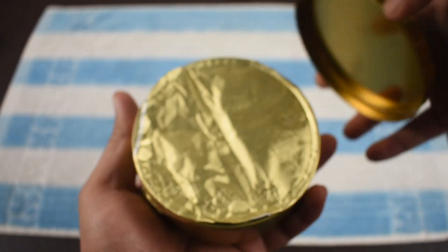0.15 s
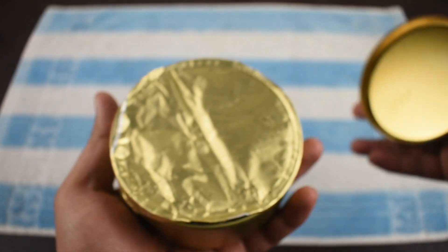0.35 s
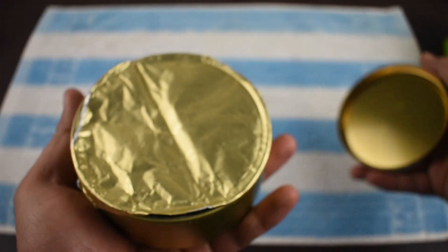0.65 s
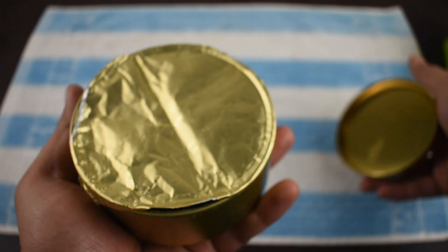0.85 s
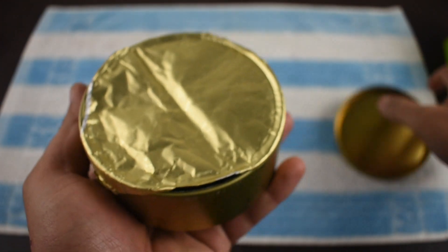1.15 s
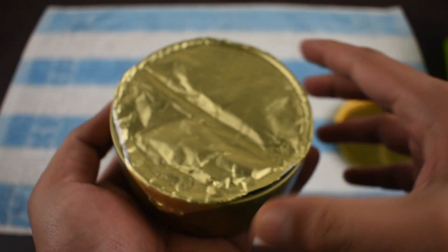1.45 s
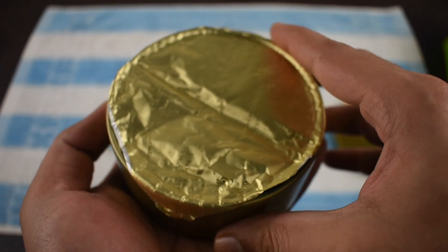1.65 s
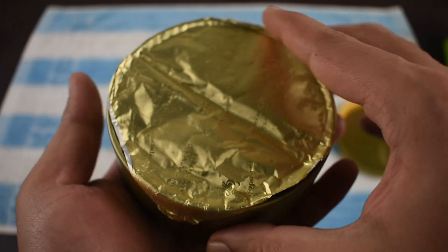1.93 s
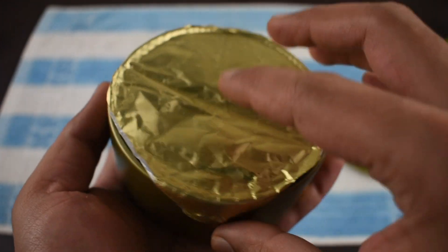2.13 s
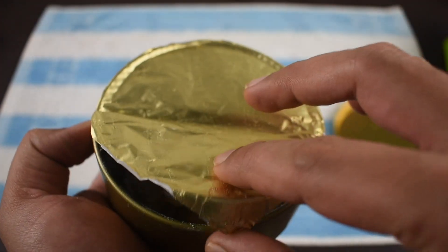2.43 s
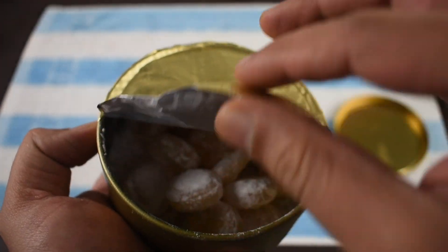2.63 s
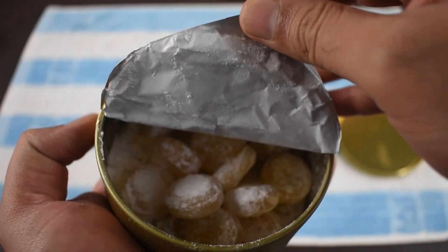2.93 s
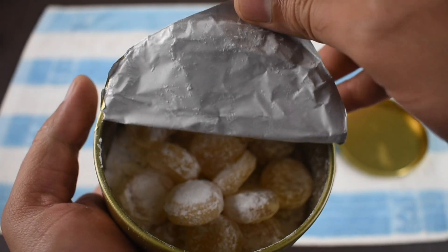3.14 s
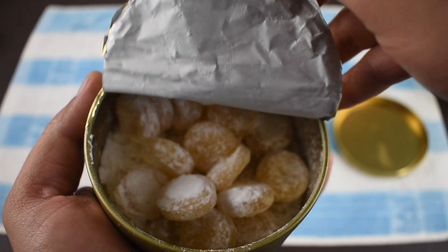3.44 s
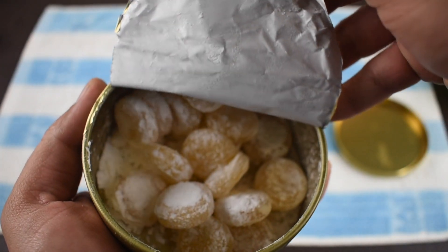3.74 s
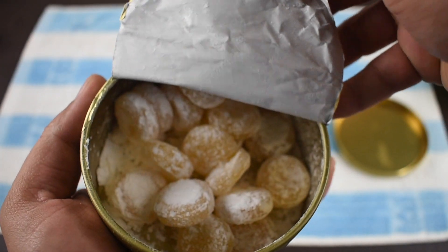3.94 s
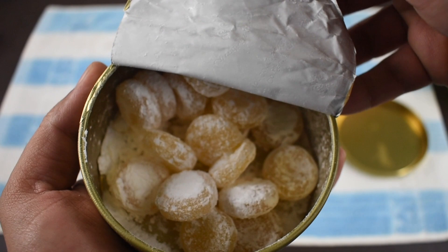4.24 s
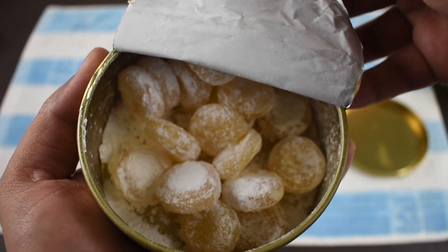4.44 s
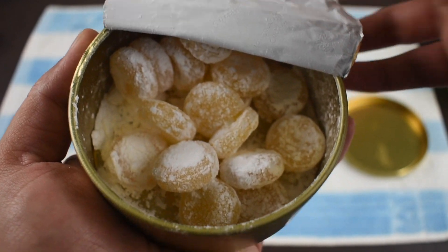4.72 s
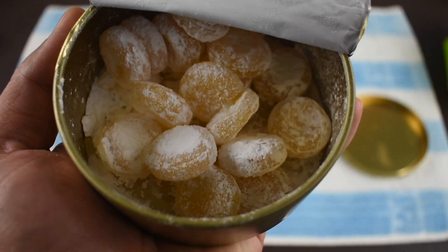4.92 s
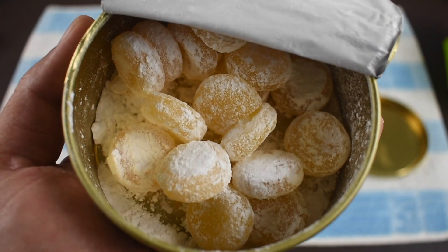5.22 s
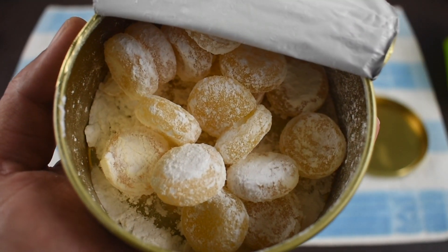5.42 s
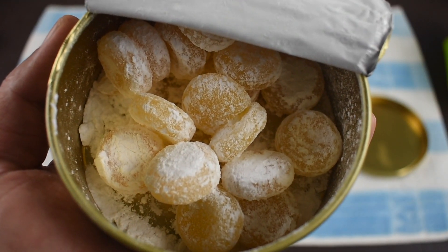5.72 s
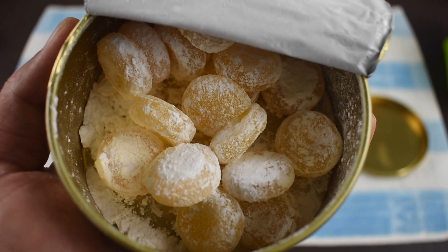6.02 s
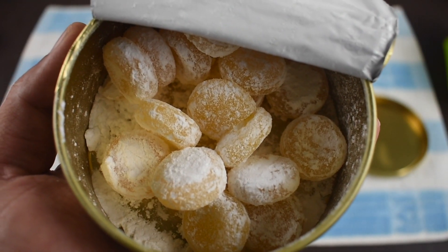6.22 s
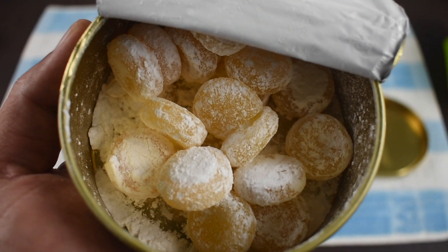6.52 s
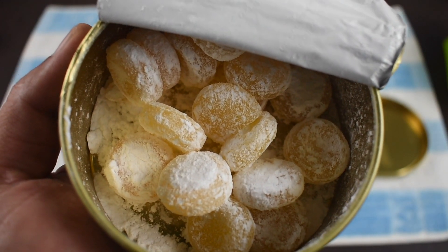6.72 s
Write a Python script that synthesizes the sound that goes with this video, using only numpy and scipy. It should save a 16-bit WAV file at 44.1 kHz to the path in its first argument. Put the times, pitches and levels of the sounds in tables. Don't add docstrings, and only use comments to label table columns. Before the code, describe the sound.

A quiet, hard-walled room with faint steady hiss and a low murmur, the microphone very close. Only tiny ticks and a soft tap at first. At about 1.0 s a metal lid lands on cloth with a soft brushing slide, settling by 1.4. Fingers lightly rub foil from 1.6, tap near 1.95, then rub firmly at 2.2 to 2.3 with small dull crinkles, fading by 2.8. From 3.1 the foil snaps sharply, building to a very loud crack at 3.33 and another bright one at 3.5, ringing thinly with a short room tail; small ticks follow to 3.75. Faint creases at 3.9 and 4.25. At 4.65 the flap scrapes briefly and knocks the tin rim, sharpest at 4.76. A soft dull grip shift spans 5 to 5.7. A clear dry click at 5.93, then quiet, and a quick cluster of small clicks at 6.54 to 6.64.

```python
import sys
import numpy as np
from scipy import signal
from scipy.fft import rfft, irfft
from scipy.io import wavfile

SR = 44100
rng = np.random.default_rng(int(sys.argv[2]) if len(sys.argv) > 2 else 0)


def materialize(psi):
    bounded = np.clip(np.atleast_2d(psi).T, -1, 1)
    quanta = np.round(bounded * 32767).astype(np.int16)
    wavfile.write(sys.argv[1], SR, quanta)


def volts(x):
    e = np.asarray(x, float) / 20
    return 10 ** e


N = 302878

# start in seconds, peak in dB, crease pitch in Hz,
# thump below 700 Hz in dB, sharpness (edge level) in dB.
CREASE_SNAPS = [(2.212, -33, 1900, -8.5, -13), (2.246, -35, 826, -7, -21), (2.271, -40, 940, -30, -10),
                (2.313, -38, 1190, -27, -18), (3.092, -15, 1097, -23.5, -20.5),
                (3.225, -16, 1010, -20, -19.5), (3.244, -17.5, 1400, -25, -36.5),
                (3.293, -11, 1780, -22.5, -41), (3.331, -0.5, 1190, -20, -10),
                (3.496, -7.5, 1215, -21.5, -0.5), (3.874, -34.5, 2340, -7.5, -4.5),
                (3.883, -28, 2460, -25, -8.5), (3.911, -36.5, 1304, -9, 0), (4.255, -43, 1570, -18, -3.5)]
RIM_KNOCKS = [
    (4.655, -38, 1480, -9, -5),
    (4.75, -31, 1070, -5, -9),
    (4.759, -26.5, 2240, -8.5, 6),
]
# start in seconds, peak in dB, pitch in Hz,
# ring near 1.2 kHz in dB, sharpness in dB.
LOOSE_CLICKS = [
    (5.467, -45, 2760, -12, -4),
    (5.773, -51.5, 3050, -14, -2),
    (5.9319, -17.5, 2560, -12.5, -6.5),
    (6.5355, -33.5, 2480, -4, -13),
    (6.539, -45.5, 2000, 12, -16),
    (6.6055, -40, 2300, -13, -2.2),
    (6.6086, -36, 2600, -4, 9),
    (6.6152, -33, 2460, -8, -10),
    (6.6195, -37, 2500, 1.5, -13),
    (6.6435, -42, 2890, -0.5, -4),
]
# frequency in Hz, level in dB, t60 in seconds.
FOIL_MODES = [(338, -1.5, 0.093), (426, -2.5, 0.16), (733, -10.5, 0.75), (790, -9.5, 0.26),
              (961, -5.5, 0.15), (1108, -9.5, 0.25), (1274, -15, 0.23), (1293, -16, 0.14), (1384, -4, 0.3),
              (1601, -17.5, 0.93), (1780, -3, 0.23), (2040, -12, 0.15), (2050, -13.5, 0.4),
              (2238, -8.5, 0.3), (2660, -9, .3), (3240, -13.5, 0.25), (4130, -13.5, 0.32), (5405, -9, .12),
              (6920, -26, .25)]
# frequency in Hz, level in dB, t60 in seconds.
TIN_MODES = [(371, 1.5, 0.19), (402, -6, 0.18), (644, -6.5, 0.23), (676, -6, .15), (826, -1, 0.14),
             (1187, 2, 0.13), (1590, -4, 0.32), (2310, -11, .22), (2300, -1, 0.13), (3500, -22, .12),
             (4040, -15, 0.17), (5540, -8, 0.14), (6000, -7, 0.18)]
# frequency in Hz, level in dB, t60 in seconds.
HOUSING_MODES = [(2567, -0.5, 0.016), (3750, 1.5, 0.011), (531, 2.5, 0.03), (1610, -12, 0.022)]

# time of greatest pressure in seconds, level in dB,
# seconds to rise 20 dB, seconds to fall 20 dB, hiss over body in dB.
FLAP_STROKES = [
    (4.656, -48, .008, 0.096, -3),
    (4.73, -47, 0.28, .05, 11),
]
FINGER_STROKES = [
    (1.698, -63.5, 0.25, 0.68, 1.6),
    (1.966, -52, 0.02, 0.029, -10),
    (2.21, -45.5, 0.0046, 0.048, -0.5),
    (2.242, -43, .02, 0.16, -12),
    (2.318, -52.5, 0.035, 0.38, -4),
    (2.478, -59, .08, .25, 2.5),
    (2.562, -52.5, 0.022, 0.18, -2.2),
]
LID_STROKES = [
    (1.005, -57, .25, .05, 2.5),
    (1.017, -39.5, .006, .14, -6),
    (1.034, -42.5, .015, .2, 4),
    (1.225, -51, .04, .2, -6),
]
GRIP_STROKES = [
    (5.076, -61.5, .11, 0.84, -18),
    (5.47, -58.5, .018, .04, -20),
    (5.49, -66, 0.028, 0.28, -16),
]
FLAP_SPAN_S = (4.648, 4.748)
FINGER_SPAN_S = (1.55, 2.8)
LID_SPAN_S = (.85, 1.5)
GRIP_SPAN_S = (4.95, 5.75)
# frequency in Hz, density in dB per Hz.
FLAP_COLOUR = [(88, -51.5), (150, -15.5), (566, -14), (649, -5), (888, -5), (1980, -4.5), (2220, -1.5),
               (2500, -9), (7770, -17), (16000, -29)]
FINGER_COLOUR = [(88, -50), (150, -38), (226, 4.5), (368, -18), (555, -13), (612, 1.5), (979, -4),
                 (3350, -11), (8230, -22), (14800, -25), (16000, -37)]
LID_COLOUR = [(88, -43), (150, -36), (280, -12.5), (368, -51), (422, -36), (702, -11.5), (1500, -2.5),
              (1660, -11), (2060, -6), (8230, -21.5), (16000, -30)]
GRIP_COLOUR = [(100, -20), (300, -4.5), (550, 2), (900, -12.5), (1600, -1.5), (2300, -5), (3500, -19.5),
               (16000, -37.5)]
# frequency in Hz, width in Hz, level in dB.
FLAP_RINGS = [(2180, 12, 5), (2710, 31, 1), (3630, 140, 2), (4330, 45, -4), (5500, 39, -4), (5670, 83, -3),
              (7920, 21, -8), (11100, 85, -12), (14300, 100, -15)]
FINGER_RINGS = [(989, 67, 5), (1190, 39, -2), (1455, 21, 4), (2190, 40, -7), (4210, 27, -25),
                (8230, 270, -20), (9500, 92, -18)]

# start in seconds,
# peak in dB, pitch in Hz.
WRINKLE_TICKS = [(.0494, -47, 3500), (.5384, -48, 6570), (1.236, -49, 12500), (2.9577, -54, 9540),
                 (2.9816, -42, 7360), (2.9994, -49, 8500), (3.3124, -40, 9500), (3.3203, -40, 9500),
                 (3.328, -42, 9000), (3.4535, -42, 4300), (3.477, -35.5, 4500), (3.5313, -18, 3240),
                 (3.6625, -26.5, 2800), (3.7197, -33, 3830), (3.741, -35, 2570), (3.9195, -43, 5540),
                 (4.59, -39, 7000), (4.6075, -42.5, 3980), (4.638, -37.5, 4995), (6.595, -45, 3500)]
# start in seconds, peak in dB, pitch in Hz.
FINGER_TAPS = [
    (0.161, -48, 980),
    (1.907, -47, 860),
    (1.968, -44.5, 950),
]
# start in seconds, peak in dB, pitch in Hz.
HANDLING_BUMPS = [
    (1.06, -60, 115),
    (2.24, -54, 232),
    (3.885, -63, 106),
    (4.755, -59, 141),
    (5.4, -69.5, 116),
    (6.537, -58, 230),
    (6.6, -73, 90),
]

# frequency in Hz, t60 in seconds, level in dB.
ROOM_DECAY = [(150, .5, -4), (511, 0.8, 4.5), (1400, 0.61, -2), (3710, 0.49, 4), (5800, .55, 9),
              (9736, 0.51, 8), (16000, 0.35, 3.5)]
# frequency in Hz, density in dB per Hz.
HISS_COLOUR = [(15, -49.5), (25, -18), (65, -25.5), (124, -8), (397, -3.5), (550, -2.5), (2250, -5),
               (8280, -12.5), (15000, -20.5), (16300, -36.5)]
# frequency in Hz, width in Hz, level in dB.
MURMUR_RESONANCES = [(120, 30, -14.5), (364, 100, -4), (426, 100, 0.5), (548, 65, -1), (820, 45, -3),
                     (1316, 58, -3), (1820, 80, -6)]
# time in seconds, level in dB.
STIR_LEVEL = [(0, -66), (.6, -71.5), (1.2, -58.5), (1.7, -64), (3.799, -67), (4.3, -77), (5.6, -66.5),
              (6.87, -66.5)]
# time in seconds, level in dB.
WHINE_LEVEL = [(2.2, -90), (2.35, -69.5), (2.8, -70), (3.0, -84)]


def snaps(events, rise_s, t60, low_hz, crack_db, crack_follows):
    near, sent = np.zeros(N), np.zeros(N)
    t = np.arange(2048) / SR
    single = 1.0 * (np.arange(2048) == 32 * np.arange(4)[:, None])
    envelope = (1 - np.exp(-t / rise_s)) * volts(-60 * t / t60) * (1 + np.exp(-t / 0.00075))
    draws = rng.standard_normal((len(events), 4, 2048))
    for (s, peak_db, hz, thump_db, sharp_db), draw in zip(events, draws):
        colour = hz, thump_db, sharp_db, crack_db + crack_follows * sharp_db
        near = place(near, s, volts(peak_db) * sheet_parts(draw * envelope, low_hz, *colour))
        sent = place(sent, s, volts(peak_db) * sheet_parts(single, low_hz, *colour))
    return near, sent


def sheet_parts(drive, low_hz, hz, thump_db, edge_db, crack_db):
    top_hz = np.clip(14000 * volts(0.34 * crack_db), 6000, 18000)
    crease = band(band(drive[0], 0.51 * hz, 2.68 * hz), 0.74 * hz, 9.3 * hz)
    crease = resonate(crease, hz, 0.36 * hz)
    thump = band(band(drive[1], 0.83 * low_hz, 1.65 * low_hz), 0.4 * low_hz, 1.8 * low_hz)
    edge = band(band(drive[2], 2500, 5200), 2000, 6500)
    crack = band(band(drive[3], 4200, top_hz), 3800, 19000)
    low_parts = peak_one(crease) + volts(thump_db) * peak_one(thump)
    return low_parts + volts(edge_db) * peak_one(edge) + volts(crack_db) * peak_one(crack)


def modes(push, table, gain_db):
    return sum(volts(db + gain_db) * ring(push, hz, min(t60, 0.38)) for hz, db, t60 in table)


def slide(strokes, span_s, colour, per_s, spread_db, haste, rings=()):
    begin, end = span_s
    start, size = round(begin * SR), round((end - begin) * SR)
    t = (start + np.arange(size)) / SR
    slips = (rng.random(size) < per_s / SR) * volts(spread_db * np.minimum(rng.exponential(1, size), 4))
    slips = slips * rng.choice([-1, 1], size)
    sound = coloured(slips, colour)
    sound = sound + sum(volts(db / 4 + 10) * resonate(sound, hz, 2.1 * width) for hz, width, db in rings)
    body = band(sound, 120, 4500)
    hiss = band(sound[::-1], 4500, 17000)
    body_gain, hiss_gain = pressure(strokes, t, haste)
    fade = np.clip(np.minimum(t - begin, end - t) / 0.0034, 0, 1)
    out = np.zeros(N)
    out[start:start + size] = fade * (rms_one(body) * body_gain + rms_one(hiss) * hiss_gain)
    return out


def pressure(strokes, t, haste):
    s, peak_db, rise_s, fall_s, hiss_db = np.transpose(strokes)[:, :, None]
    before, after = (s - t) / np.maximum(rise_s, 0.001), (t - s) / np.maximum(fall_s, 0.001)
    away_db = 20 * np.maximum(before, after)
    levels = peak_db - away_db, peak_db + hiss_db - haste * away_db
    return [np.sqrt(np.sum(volts(db) ** 2, axis=0)) for db in levels]


def blips(events, width, t60):
    out, t = np.zeros(N), np.arange(6144) / SR
    for (s, peak_db, hz), draw in zip(events, rng.standard_normal((len(events), 6144))):
        burst = resonate(draw * volts(-60 * t / t60), hz, width * hz)
        burst = resonate(burst, hz, 2.0 * width * hz)
        out = place(out, s, volts(peak_db) * peak_one(burst))
    return out


def room(x):
    size = 30000
    t, edges = np.arange(size) / SR, 120 * 2 ** np.arange(0, 7.6, 0.5)
    white = rng.standard_normal((2, size))
    lumps = drift(220)[:size]
    tail = 0
    for k, (low, high) in enumerate(zip(edges, edges[1:])):
        patchy_db = 1.5 * (1.5 * lumps + 0.45 * drift(35)[:size])
        level_db = at_hz(ROOM_DECAY, low * 1.34, axis=2) + patchy_db
        tail = tail + band(white[k % 2], low, high) * volts(level_db - 60 * t / at_hz(ROOM_DECAY, low))
    build_up = 1 - np.exp(-(t / 0.0017) ** 2)
    return signal.fftconvolve(x, tail * build_up)[:N]


def hush():
    t = np.arange(N) / SR
    still = volts(-60) * rms_one(coloured(rng.standard_normal(N), HISS_COLOUR))
    air = rng.standard_normal(N)
    stir = 0
    for hz, width, db in MURMUR_RESONANCES:
        swell = volts(db + 3 * drift(6.0))
        stir = stir + swell * rms_one(resonate(resonate(air, hz, width), hz, 3 * width))
    stir_db = np.interp(t, *np.transpose(STIR_LEVEL))
    whine_hz, width_hz = 2090, 12
    whine = rms_one(resonate(resonate(air, whine_hz, width_hz), whine_hz, width_hz))
    whine_db = np.interp(t, *np.transpose(WHINE_LEVEL), left=-120, right=-120)
    return still + rms_one(stir) * volts(stir_db) + whine * volts(whine_db)


def drift(rate):
    knots = rng.standard_normal(round(N / SR * rate) + 2)
    return np.interp(np.arange(N) / SR * rate, np.arange(len(knots)), knots)


def ring(x, hz, t60):
    r, w = volts(-60 / (t60 * SR)), 2 * np.pi * hz / SR
    return signal.lfilter([0, np.sin(w)], [1, -2 * r * np.cos(w), r * r], x + 1e-18)


def resonate(x, hz, width_hz):
    r = np.exp(-np.pi * width_hz / SR)
    poles = [1, -2 * r * np.cos(2 * np.pi * hz / SR), r * r]
    return signal.lfilter([(1 - r * r) / 2, 0, (r * r - 1) / 2], poles, x)


def band(x, low_hz, high_hz):
    edges = [low_hz, min(high_hz, SR / 2.2)]
    return signal.sosfilt(signal.butter(2, edges, "band", fs=SR, output="sos"), x)


def coloured(x, spectrum):
    gain = volts(at_hz(spectrum, np.fft.rfftfreq(len(x), 1 / SR)))
    return irfft(rfft(x) * gain, len(x))


def at_hz(points, hz, axis=1):
    points = np.array(points)
    return np.interp(np.log(np.maximum(hz, 1)), np.log(points[:, 0]), points[:, axis])


def rms_one(x):
    return x / np.sqrt(np.mean(x ** 2) + 1e-20)


def peak_one(x):
    return x / np.max(np.abs(x))


def place(out, s, sound):
    return out + np.pad(sound, (round(s * SR), N))[:N]


def scene():
    snap, snap_sent = snaps(CREASE_SNAPS, 0.00035, 0.036, low_hz=410, crack_db=-2, crack_follows=0.74)
    knock, knock_sent = snaps(RIM_KNOCKS, 0.00013, 0.027, low_hz=466, crack_db=-0.5, crack_follows=0.49)
    click, click_sent = snaps(LOOSE_CLICKS, 0.0001, 0.0082, low_hz=1101, crack_db=-14, crack_follows=0.91)
    click = click + modes(click_sent, HOUSING_MODES, -23.0)
    flap = slide(FLAP_STROKES, FLAP_SPAN_S, FLAP_COLOUR, 17000, spread_db=-2.5, haste=5.4, rings=FLAP_RINGS)
    lid = slide(LID_STROKES, LID_SPAN_S, LID_COLOUR, 15000, spread_db=1.0, haste=1.39)
    grip = slide(GRIP_STROKES, GRIP_SPAN_S, GRIP_COLOUR, 12000, spread_db=3.5, haste=0.6)
    fingers = slide(FINGER_STROKES, FINGER_SPAN_S, FINGER_COLOUR, 4000, spread_db=3.5, haste=1.38,
                    rings=FINGER_RINGS)
    hands = lid + grip + fingers
    small = blips(WRINKLE_TICKS, 0.8, 0.013) + blips(FINGER_TAPS, 0.09, 0.022)
    small = small + blips(HANDLING_BUMPS, 0.51, 0.025)
    foil = modes(snap + 0.41 * snap_sent, FOIL_MODES, -45.0)
    tin = modes(knock + 0.54 * flap, TIN_MODES, -42.0)

    sent = 1.56 * snap_sent + 1.17 * knock_sent + 0.22 * click_sent + 1.2 * foil + 0.73 * tin
    sent = sent + 0.5 * flap + 0.44 * hands + 0.69 * small
    near = snap + knock + click + flap + hands + small + 0.59 * foil + tin
    return (near + volts(-43.5) * room(sent) + hush())[None]


def top_cut(x):
    return signal.sosfilt(signal.butter(12, 17010, fs=SR, output="sos"), x)


def record(dry):
    dry = signal.sosfilt(signal.cheby2(10, 40, 16600, fs=SR, output="sos"), dry)
    dry = dry + 0.09 * dry ** 4
    mix = dry / (1 + dry ** 12) ** (1 / 12)
    return top_cut(mix)


dry = scene()
out = record(dry)
materialize(out)
```